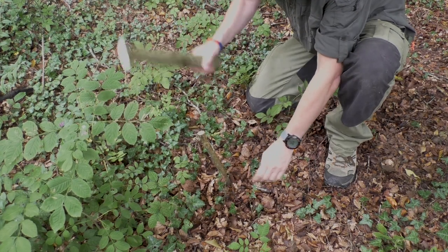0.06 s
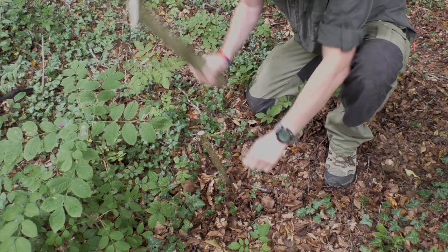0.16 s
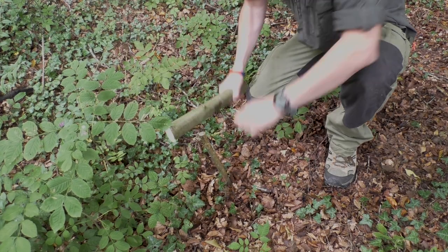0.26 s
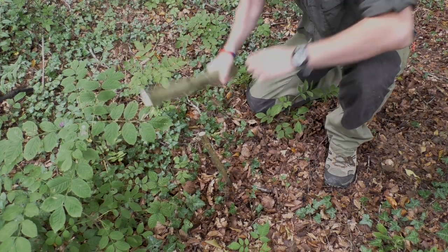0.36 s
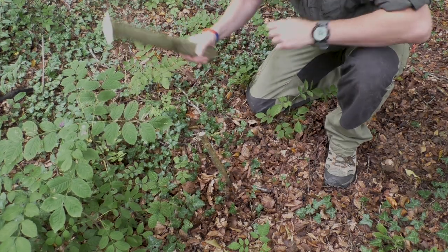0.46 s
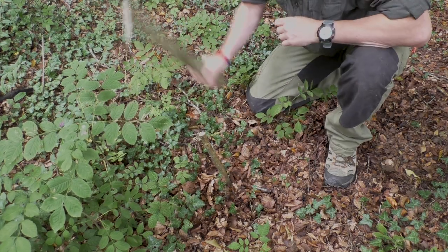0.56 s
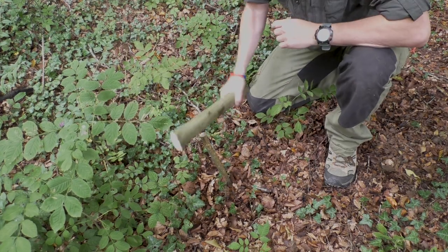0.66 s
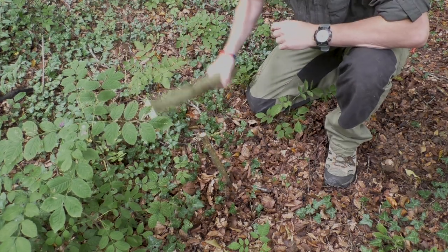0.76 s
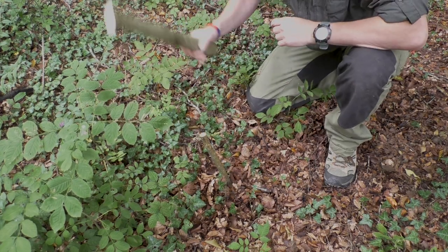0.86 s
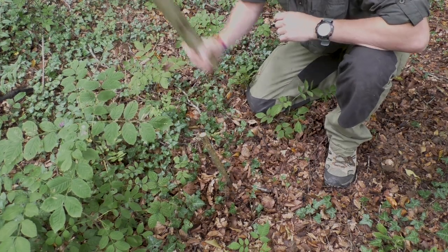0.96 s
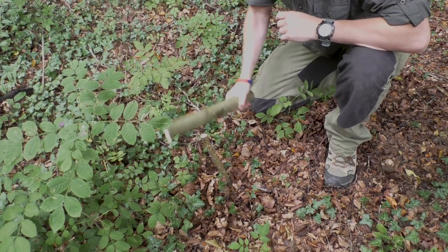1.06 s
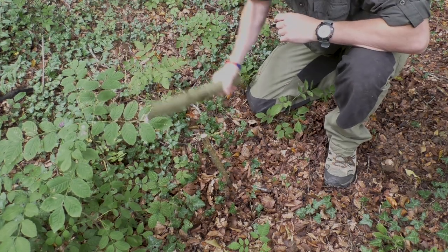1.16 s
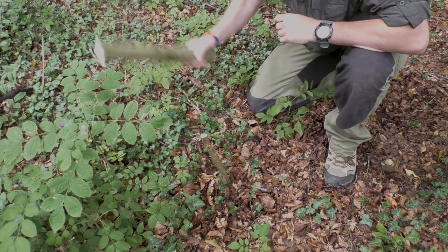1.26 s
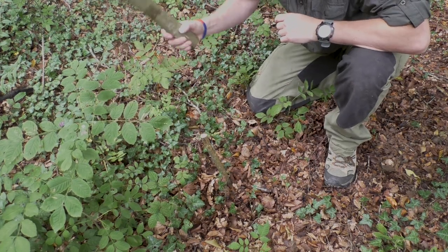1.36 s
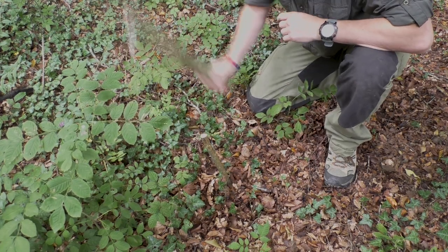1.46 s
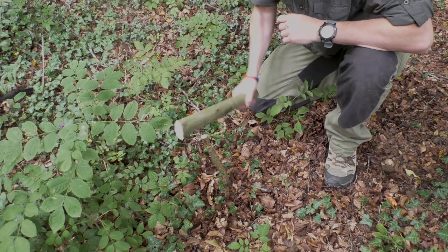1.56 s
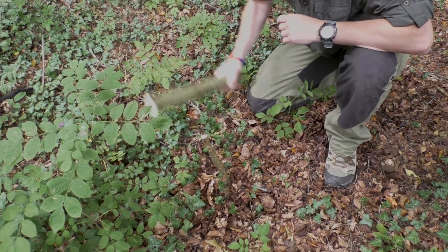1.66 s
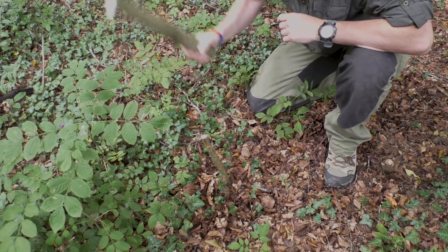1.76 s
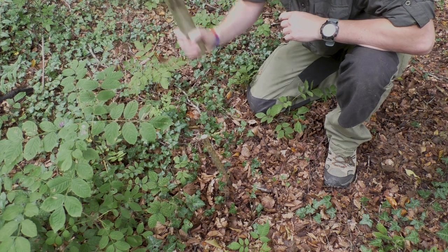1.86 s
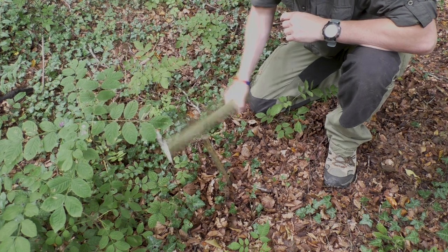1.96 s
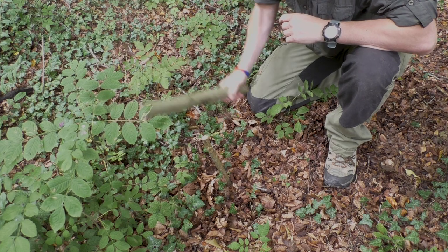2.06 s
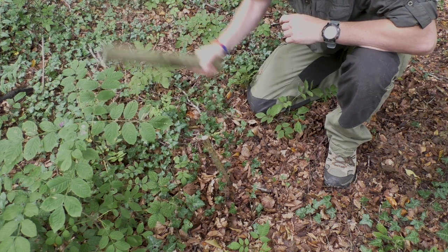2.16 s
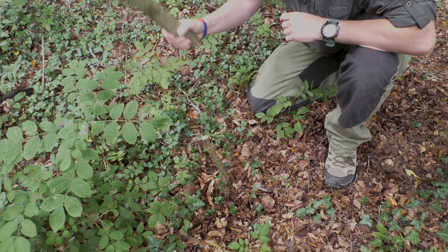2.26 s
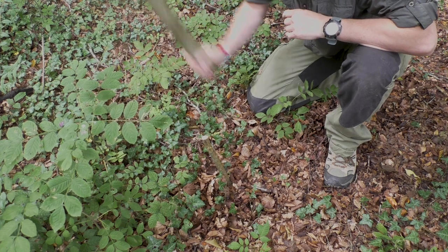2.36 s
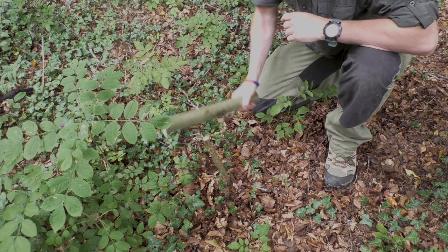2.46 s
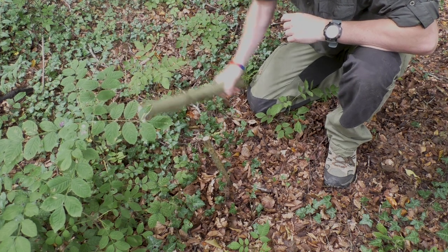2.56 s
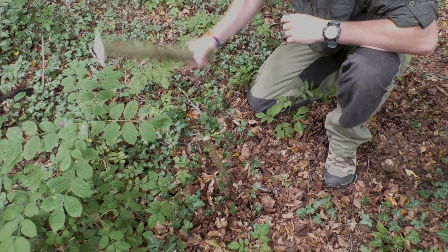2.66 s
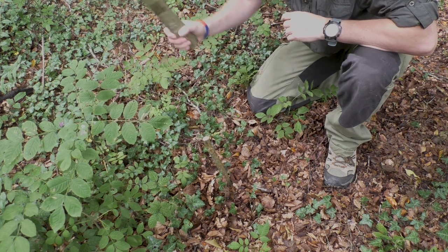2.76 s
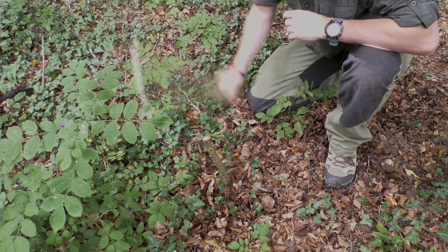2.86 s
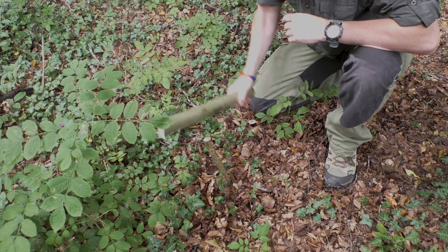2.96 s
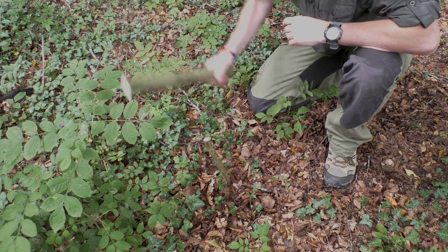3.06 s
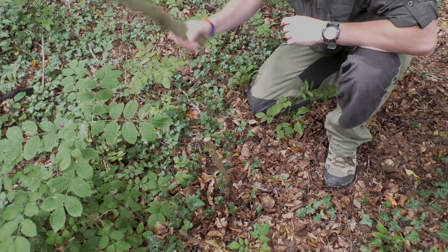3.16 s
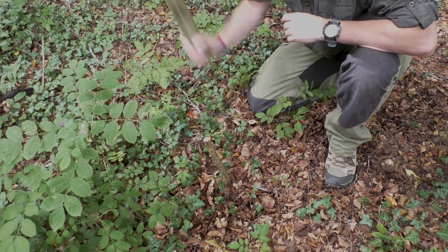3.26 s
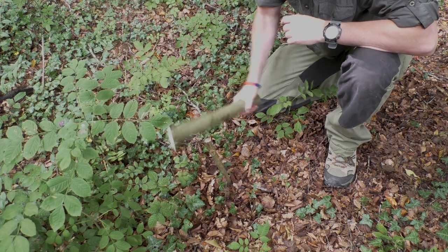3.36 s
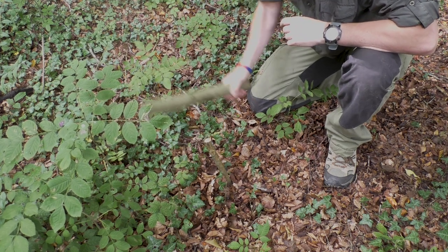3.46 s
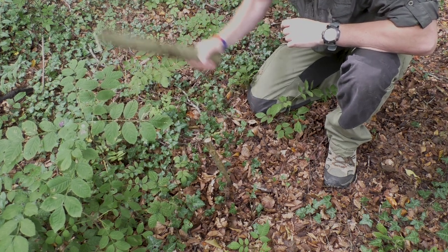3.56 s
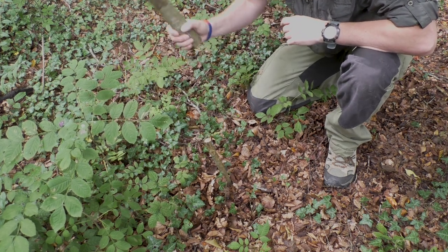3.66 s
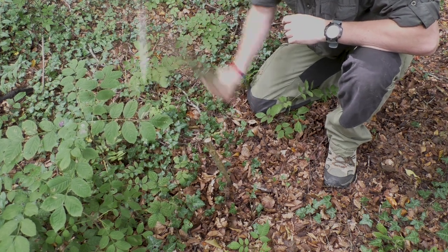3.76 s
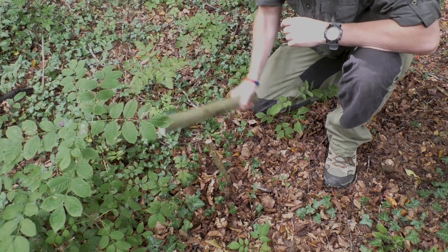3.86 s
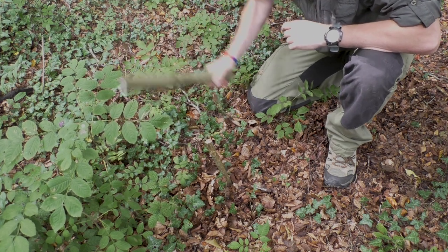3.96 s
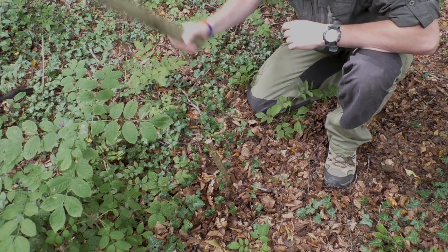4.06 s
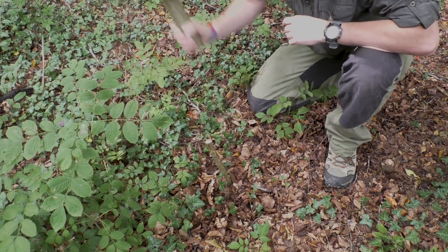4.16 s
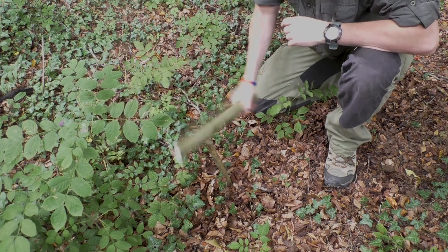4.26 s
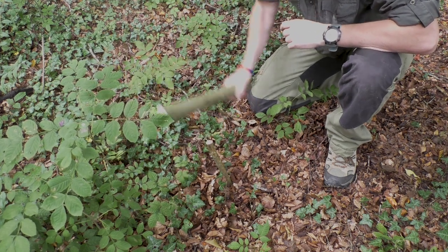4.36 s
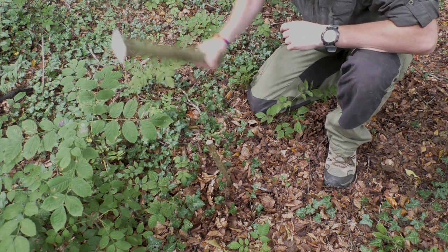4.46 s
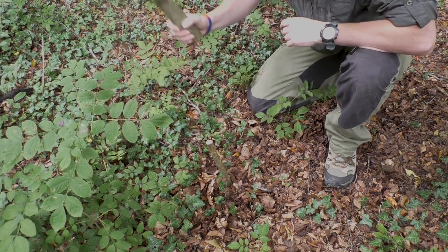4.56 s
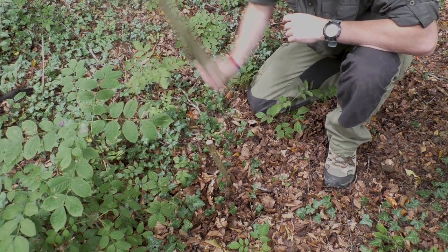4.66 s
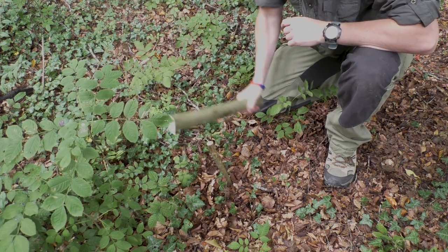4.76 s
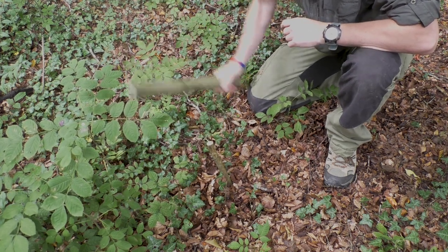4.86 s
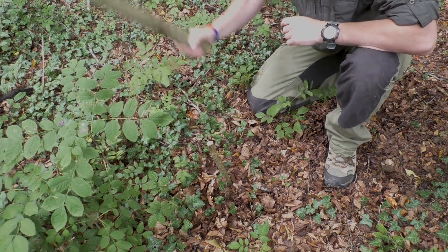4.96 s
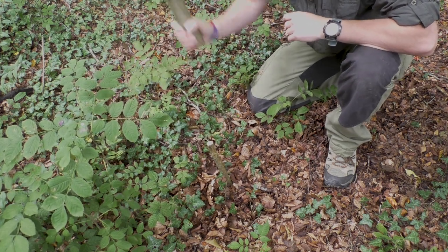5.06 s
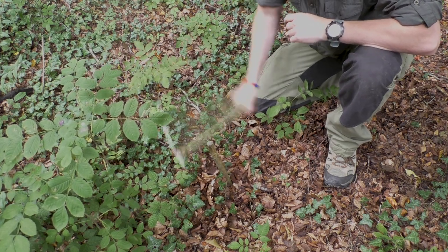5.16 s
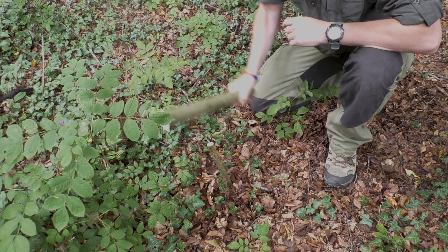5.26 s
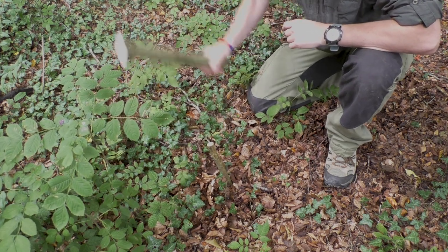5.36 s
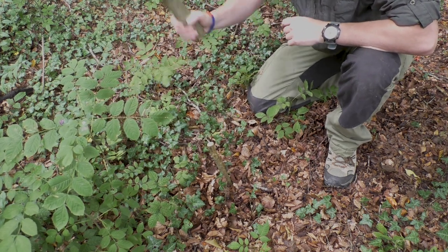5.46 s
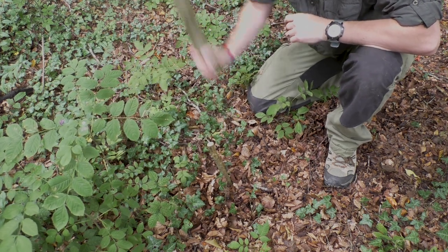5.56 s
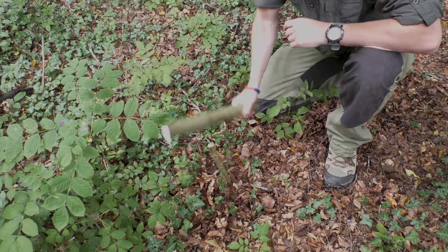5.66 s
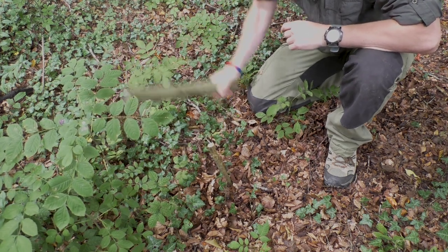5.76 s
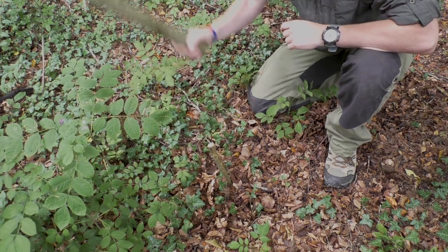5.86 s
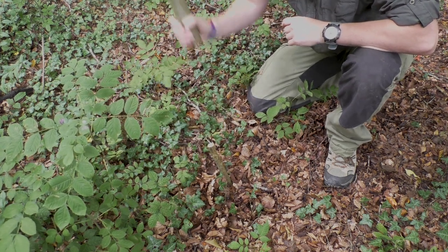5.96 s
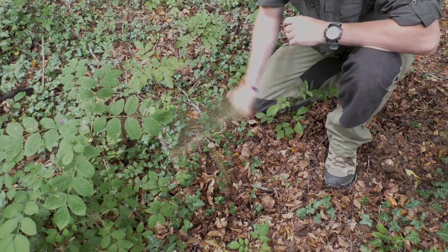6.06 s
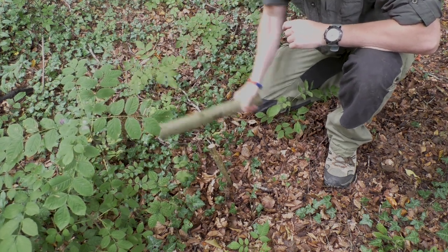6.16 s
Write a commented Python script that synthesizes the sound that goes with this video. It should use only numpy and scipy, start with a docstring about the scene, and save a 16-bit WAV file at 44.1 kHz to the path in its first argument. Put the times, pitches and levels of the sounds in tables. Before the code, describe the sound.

Steady hammering of wood on wood outdoors: loud, dry, slightly overloaded knocks, each with a brief crack on top and a deep soil thump below, growing heavier as the peg sinks. The close microphone dips briefly after each peak. Small dry leaf rustles and twig ticks appear in the gaps, over steady woodland rush and gusty low rumble, stronger toward the end.

```python
"""A wooden peg is driven into the forest floor with a thick stick, in fourteen nearly even blows.
Each blow is a ring of decaying wood tones and a noisy crack, over a low thud and a shiver in the soil.
Dry leaves and small twigs crackle in short noise swells, wind rumbles in gusts, and the woods rush as
shaped noise. The gain control ducks everything briefly after loud peaks; hiss, soft overload and a
top cut follow."""
import sys
import numpy as np
from scipy import signal
from scipy.fft import rfft, irfft
from scipy.io import wavfile
from scipy.ndimage import uniform_filter1d

SR = 44100
rng = np.random.default_rng(int(sys.argv[2]) if len(sys.argv) > 2 else 0)


def put_to_file(sound):
    """Save the sound as 16-bit audio at rate SR, in the file named by the first command-line argument."""
    columns = np.atleast_2d(sound).T  # one column per channel
    safe = np.clip(columns, -1, 1)
    whole_steps = np.round(safe * 32767)
    wavfile.write(sys.argv[1], SR, whole_steps.astype(np.int16))


N = 273420
TIME = np.arange(N) / SR  # seconds

# Blows of the stick on the peg. Each row: start in seconds, level in dB, contact hardness in Hz,
# tuning as a pitch ratio, boost of the high wood tones in dB, boost of the crack in dB.
BLOWS = [ (.267, -1.5, 3200, .96, 6, 4.5), (.663, 0, 2870, .94, 6, 4), (1.0918, .5, 3100, 0.95, 1.5, 1.5),
         (1.559, 1.4, 2770, 0.95, 4, 1), (2.0173, 1, 3020, .95, -1.5, 2), (2.4783, 2, 2580, 0.96, -1.5, -2),
         (2.9396, 2.5, 2780, 0.96, -2.5, -2), (3.3953, 1, 3330, .98, 0, 0),
         (3.8508, 2, 3020, .97, -2, -1.5), (4.3155, 1, 3500, 0.994, 2.5, 4.5),
         (4.7661, 1, 3500, 0.99, 4.5, 4.5), (5.2234, 0, 3960, 1.01, 4.5, 4.5),
         (5.6795, 2, 3000, .98, -1, 2.5), (6.1257, 3, 1200, 0.965, 2, -1.5)]
# Tones of stick and peg. Each row: pitch in Hz before tuning, level in dB before the blow's boosts,
# time to fade by 60 dB in seconds.
WOOD_TONES = [(232.8, -0.5, 0.054), (233, -9.5, 0.037), (413.5, -11.5, 0.062), (485, -0.5, 0.021),
              (615, 3, 0.0092), (933, -1.5, 0.052), (1074, 1, 0.017), (1195, 2, 0.019), (1860, 5.5, 0.0028),
              (2077, -11, 0.052), (2251, -11.5, 0.054), (2352, -1.5, 0.023), (3636, -15.5, 0.023),
              (5610, 9.5, 0.0023), (7640, -19, 0.011)]
# Colour of crushed bark. Each row: frequency in Hz, relative level in dB per Hz.
BARK_COLOUR = [(3000, -8), (4600, -15), (5600, 3.5), (7500, 2), (9500, -1.5), (10800, -39), (13200, -2.5),
               (16000, -6)]
# Rustles of dry leaves and short ticks of small twigs. Each row: middle of the swell in seconds,
# level in dB before the crackle, spread of the swell in seconds.
RUSTLES = [(.17, -57, 0.067), (.43, -57, .045), (1.452, -47.5, 0.026), (1.972, -39, 0.0029),
           (2.184, -48, 0.028), (2.683, -46.5, 0.03), (2.897, -46, .0035), (3.355, -51, .007),
           (4.287, -51, .013), (5.148, -52, .009), (5.63, -52, .014)]
# Colour of dry leaves. Each row: frequency in Hz, relative level in dB per Hz.
LEAF_COLOUR = [(1500, -23), (3300, 0.5), (6500, 3.5), (9000, 3), (10800, -12), (13000, -2), (16000, -7.5)]
# Strength of the wind on the microphone. Each row: time in seconds, level in dB before the gusts.
BREEZE = [(0, -28), (2.4, -33), (2.8, -26), (3.85, -24), (4.15, -17.5), (6.2, -16.5)]
# Colour of the wind before its fast part is reduced. Each row: frequency in Hz, relative level in dB per Hz.
WIND_COLOUR = [(6, 0), (18, -2), (42, -6), (58, -13.5), (80, -22.5), (110, -32.5), (200, -40), (500, -89.5)]
# Colour of the trees before the treble grows. Each row: frequency in Hz, relative level in dB per Hz.
WOODS_COLOUR = [(30, 6.5), (95, 4.5), (150, -1), (300, 1.5), (600, -1.5), (900, -1), (1400, -4),
                (1850, -12), (2300, -12.5), (2850, -27), (4200, -21), (7700, -21.5), (10600, -38),
                (15500, -40)]
# Colour of the amplifier hiss. Each row: frequency in Hz, relative level in dB per Hz.
HISS_COLOUR = [(300, -12), (900, 5), (1450, 11.5), (1850, 1.5), (2250, 11.5), (3000, -7.5), (3600, -7),
               (4200, -7), (7500, 1), (9000, -7), (10700, -21.5), (13000, -13), (16000, -28)]

# the low thump grows as the peg bites deeper, and with a softer, longer push
THUMP_FIRST_DB, THUMP_DB_PER_BLOW = -0.9, 0.31
THUMP_DB_PER_OCTAVE, USUAL_HARD_HZ = -1, 2900
SCATTER_LOW_HZ, SCATTER_HIGH_HZ = 900, 2400
# every downswing stirs the leaves faintly around the moment just before it lands
SWING_DB, SWING_SCATTER_DB, SWING_LEAD_S, SWING_LENGTH_S = -60, 7, 0.012, 0.057
GUST_DB, GUSTS_PER_S, GUST_EVEN_S = 1, 5.1, 0.07
# light air makes mostly slow eddies; the faster ones gain this many extra dB per dB of wind
EDDY_HZ, FAST_EDDY_GROWTH = 22, 0.39
# the treble of the trees grows steadily
TREBLE_HZ, TREBLE_START_DB, TREBLE_DB_PER_S = 2670, -2, 0.99
WOODS_DB, HISS_DB = -36.5, -52
TOP_HZ = 16300


def undb(db):
    """Turn decibels into a plain gain."""
    return 10 ** (np.asarray(db) / 20)


def unit(x):
    """Scale a sound to an average strength (rms) of 1."""
    return x / np.sqrt(np.mean(x ** 2))


def add(track, start, sound):
    """Mix a sound into the track at a time in seconds."""
    i = max(int(round(start * SR)), 0)
    track[i:i + len(sound)] += sound[:N - i]


def smooth(x, seconds):
    """Soften quick changes with a simple low-pass of the given time constant."""
    pole = np.exp(-1 / (seconds * SR))
    return signal.lfilter([1 - pole], [1, -pole], x)


def band(x, low_hz, high_hz):
    """Keep only the sound between two frequencies."""
    edges = [low_hz, min(high_hz, SR / 2 - 1000)]
    return signal.sosfilt(signal.butter(4, edges, "band", fs=SR, output="sos"), x)


def above(x, hz):
    """Keep the part of a sound above a frequency, without shifting it in time."""
    return signal.sosfiltfilt(signal.butter(4, hz, "high", fs=SR, output="sos"), x)


def noise(colour, size=N):
    """Make noise of rms 1 whose spectrum follows a colour table."""
    hz, db = np.transpose(colour)
    bins = np.maximum(np.arange(size // 2 + 1) * SR / size, 1)
    shape = undb(np.interp(np.log(bins), np.log(hz), db))
    white = rfft(rng.standard_normal(size))
    return unit(irfft(white * shape, size))


def walk(rate):
    """Wander randomly, with an rms of 1, towards a new value this many times a second."""
    hold = int(SR / rate)
    steps = np.repeat(rng.standard_normal(N // hold + 1), hold)
    return unit(uniform_filter1d(steps, hold)[:N])


def hammering():
    """Every blow is a knock and a crack of wood over a thud and a shiver in the ground."""
    out = np.zeros(N)
    t = TIME[:SR // 3]
    for count, (start, db, hard_hz, tuning, high_db, crack_db) in enumerate(BLOWS):
        softness_db = THUMP_DB_PER_OCTAVE * np.log2(hard_hz / USUAL_HARD_HZ)
        low_db = THUMP_FIRST_DB + THUMP_DB_PER_BLOW * count + softness_db
        wood = knock(t, hard_hz, tuning, low_db, high_db) + undb(crack_db) * crack(t)
        ground = undb(low_db) * thud(t) + shiver(t)
        add(out, start, undb(db) * (wood + ground))
    return out


def knock(t, hard_hz, tuning, low_db, high_db, detune=0.01):
    """The contact kicks all wood tones at once; each blow has its own boost of the low and high ones."""
    hz, db, t60 = np.transpose(WOOD_TONES)
    db = db + low_db * (hz < 350) + high_db * (hz > 1800)
    hz = hz * tuning * (1 + detune * rng.standard_normal(len(hz)))  # grip and seating change with each blow
    fade = undb(-60 * t / t60[:, None])
    tones = fade * np.cos(2 * np.pi * hz[:, None] * t)
    ring = -undb(db) @ tones
    ring[0] *= 0.5
    contact = 1 / (2 * np.pi * hard_hz)  # bark gives a little and rounds the push
    return smooth(smooth(ring, contact), contact)


def crack(t, db=-10.0, decay=0.0015, scatter_db=-18.5, scatter_decay=0.0069):
    """Bark crushes at the contact as a burst of noise; the undergrowth scatters a faint tail."""
    bark = noise(BARK_COLOUR, size=len(t)) * undb(db) * np.exp(-t / decay)
    tail = unit(band(rng.standard_normal(len(t)), SCATTER_LOW_HZ, SCATTER_HIGH_HZ))
    return bark + tail * undb(scatter_db) * np.exp(-t / scatter_decay)


def thud(t, hz=110.0, db=-7.0, decay=0.012, rise=0.0019):
    """The soil takes the peg's push in a few heavy cycles."""
    swell = (1 - np.exp(-t / rise)) * np.exp(-t / decay)
    return -undb(db) * swell * np.sin(2 * np.pi * hz * t)


def shiver(t, rest_hz=113.7, stiff_hz=148.0, relax=0.0277, db=-6.0, decay=0.03, rise=0.0073,
           spread=0.19, earth_db=-5.5):
    """The peg shivers, its pitch sinking as the squeezed soil relaxes; loose earth blurs the tone."""
    relax_s = relax * np.exp(spread * rng.standard_normal())
    hz = rest_hz + stiff_hz * np.exp(-t / relax_s)
    tone = np.sin(2 * np.pi * np.cumsum(hz) / SR)
    earth = undb(earth_db) * unit(band(rng.standard_normal(len(t)), 81.0, 199.0))
    swell = (1 - np.exp(-(t / rise) ** 2)) * np.exp(-t / decay)
    return undb(db) * swell * (tone + earth)


def leaves(grain_db=5.5):
    """Swells of tiny dry crackles: faint leaves with each swing, and the listed rustles and twig ticks."""
    swells = list(RUSTLES)
    for blow in BLOWS:
        level_db = SWING_DB + SWING_SCATTER_DB * rng.standard_normal()
        swells.append((blow[0] - SWING_LEAD_S, level_db, SWING_LENGTH_S))
    loudness = np.zeros(N)
    for middle, db, length in swells:
        loudness += undb(db) * np.exp(-0.5 * ((TIME - middle) / length) ** 2)
    crackle = unit(noise(LEAF_COLOUR) * undb(grain_db * walk(450.0)))
    return loudness * crackle


def wind():
    """Random gusts rumble on the microphone, stronger and brighter as the breeze rises."""
    breeze_db = np.interp(TIME, *np.transpose(BREEZE))
    eddies = noise(WIND_COLOUR)
    # each gust pushes evenly
    eddies = eddies / np.sqrt(uniform_filter1d(eddies ** 2, int(GUST_EVEN_S * SR)))
    fast = above(eddies, EDDY_HZ)
    fast_gain = undb(FAST_EDDY_GROWTH * (breeze_db - breeze_db.max()))
    eddies = eddies - fast + fast * fast_gain
    return eddies * undb(breeze_db + GUST_DB * walk(GUSTS_PER_S))


def woods(waver_db=0.5):
    """The surrounding trees make a broad, nearly steady rush of noise that slowly grows brighter."""
    rush = noise(WOODS_COLOUR) * undb(WOODS_DB + waver_db * walk(6.014))
    treble = above(rush, TREBLE_HZ)
    return rush - treble + treble * undb(TREBLE_START_DB + TREBLE_DB_PER_S * TIME)


def scene():
    """Add up all sources at the one microphone."""
    return (hammering() + leaves() + wind() + woods())[None]


def gain_control(x, threshold_db=-9.0, release_db_per_s=153.5, attack=0.0089):
    """Peaks above the bass pull the gain down; it then climbs back at a steady rate."""
    level_db = 20 * np.log10(np.abs(band(x, 223.0, 7100.0)) + 1e-9)
    fall = release_db_per_s * TIME
    held_db = np.maximum.accumulate(level_db + fall) - fall  # hold each peak, sinking steadily
    cut_db = np.maximum(held_db - threshold_db, 0)
    return x * undb(-smooth(cut_db, attack))


def record(dry, knee=3.4):
    """Apply gain control too slow for the first cycles, amplifier hiss, soft overload and the top cut."""
    loud = gain_control(dry[0]) + undb(HISS_DB) * noise(HISS_COLOUR)
    clipped = loud / (1 + np.abs(loud) ** knee) ** (1 / knee)
    top_cut = signal.ellip(8, 0.1, 60, TOP_HZ, fs=SR, output="sos")
    return signal.sosfiltfilt(top_cut, clipped)[None]


dry = scene()
out = record(dry)
put_to_file(out)
```